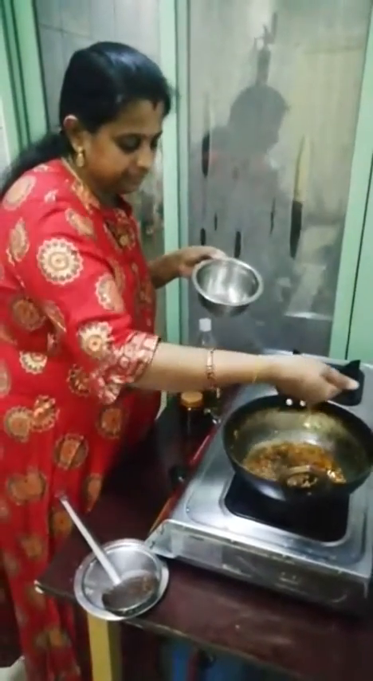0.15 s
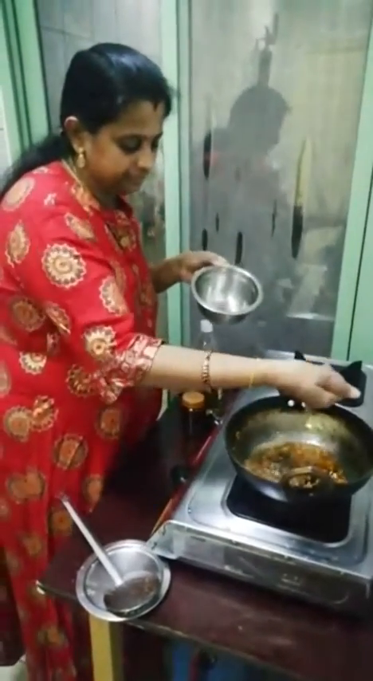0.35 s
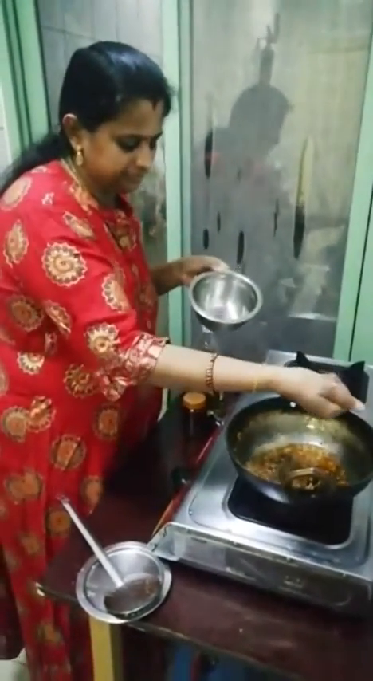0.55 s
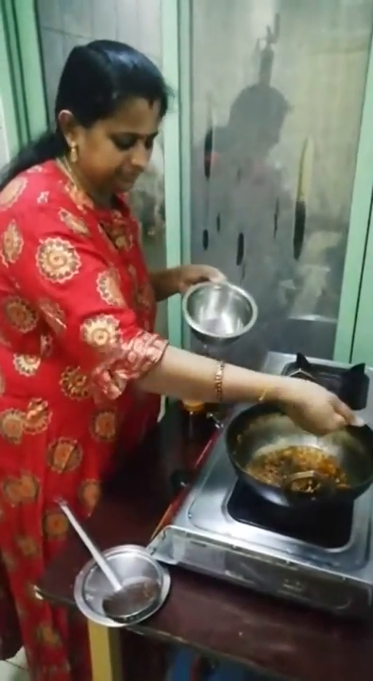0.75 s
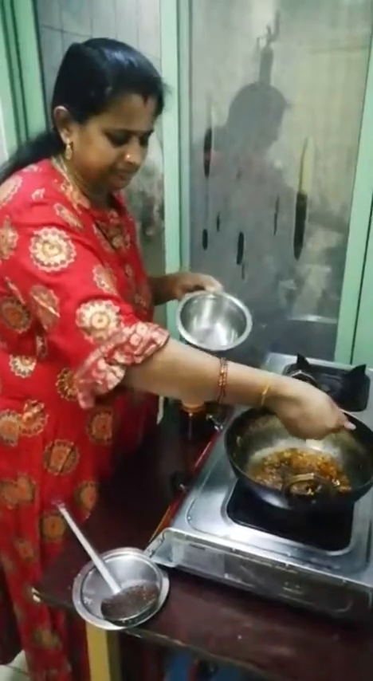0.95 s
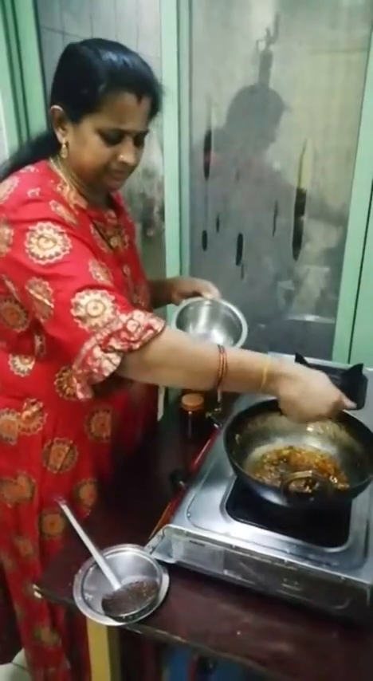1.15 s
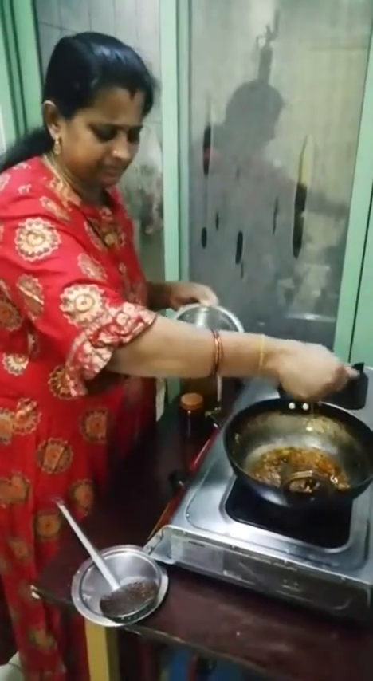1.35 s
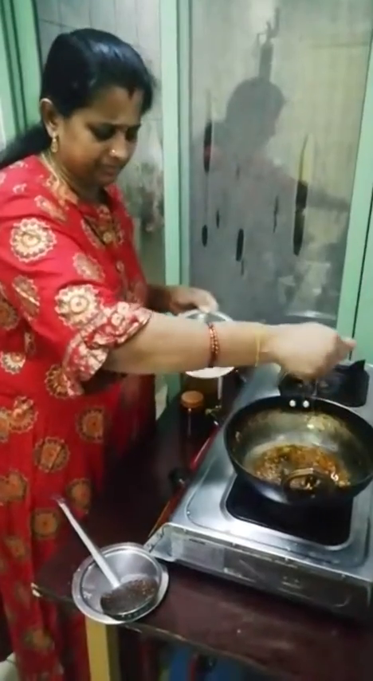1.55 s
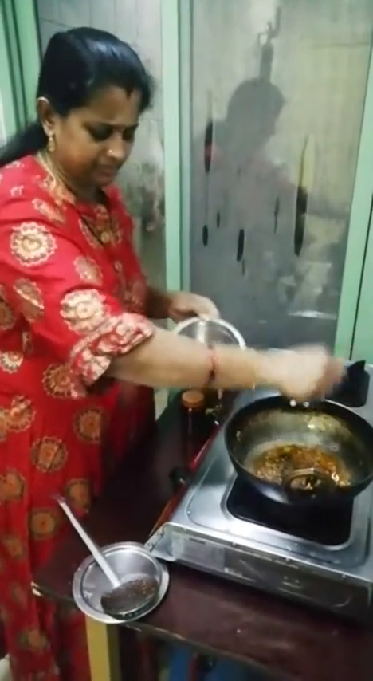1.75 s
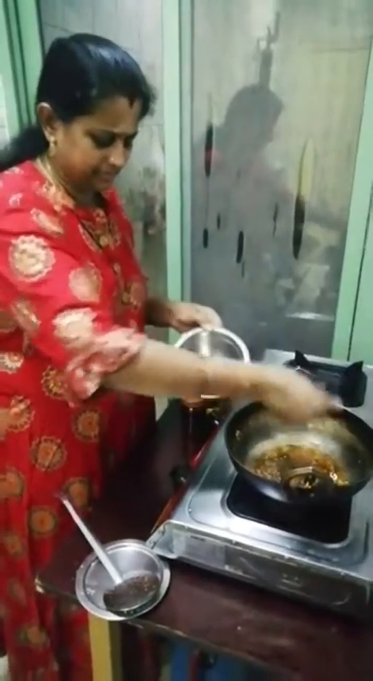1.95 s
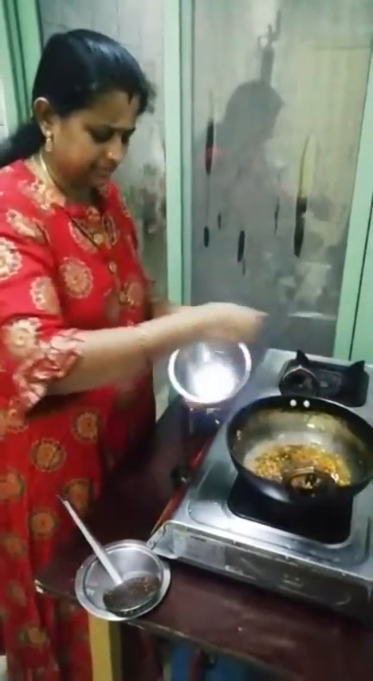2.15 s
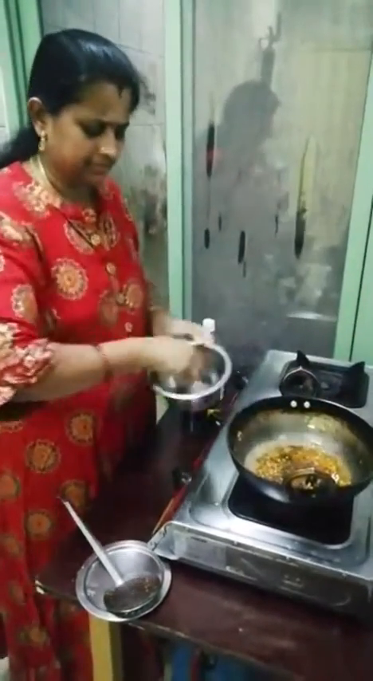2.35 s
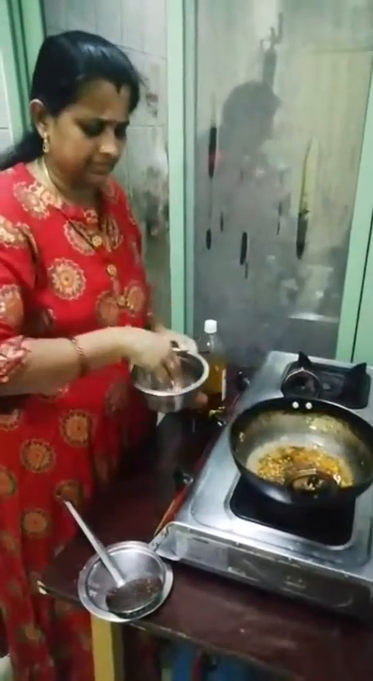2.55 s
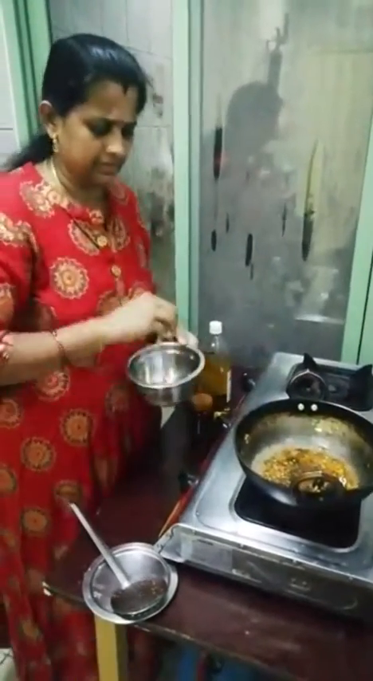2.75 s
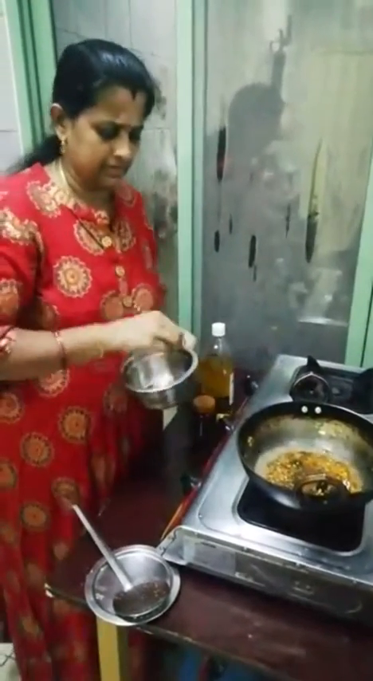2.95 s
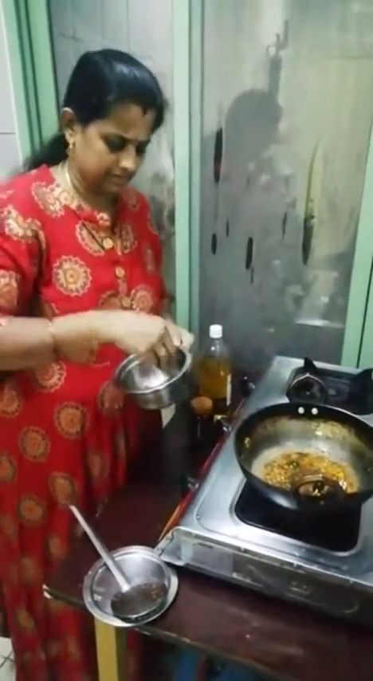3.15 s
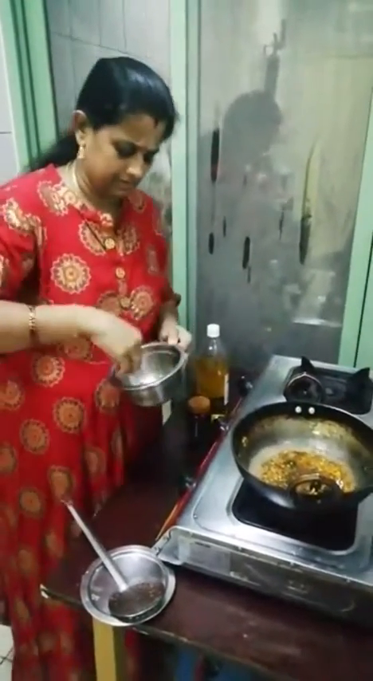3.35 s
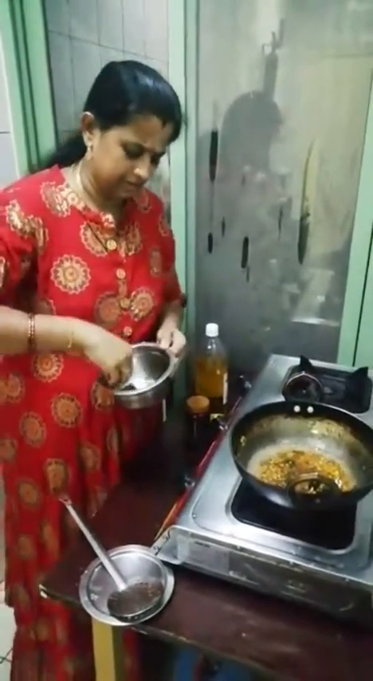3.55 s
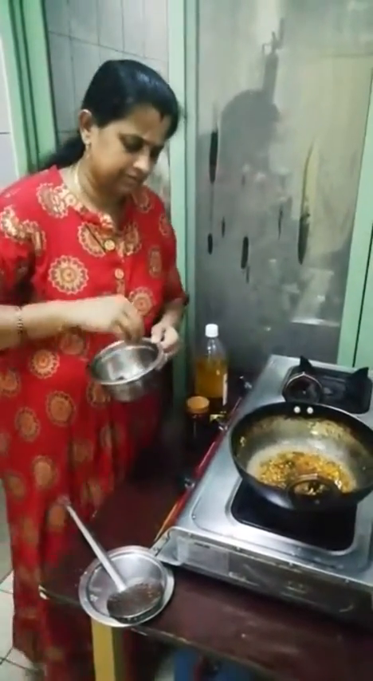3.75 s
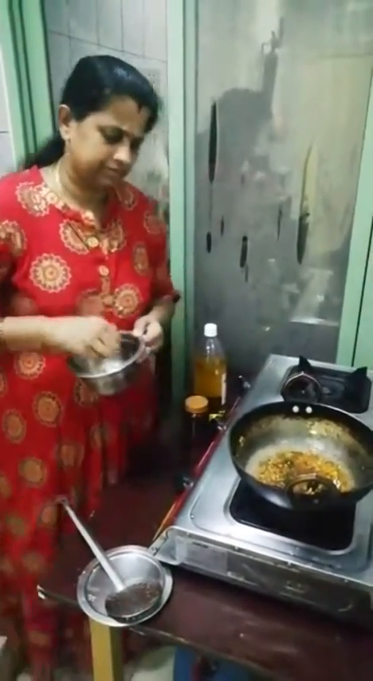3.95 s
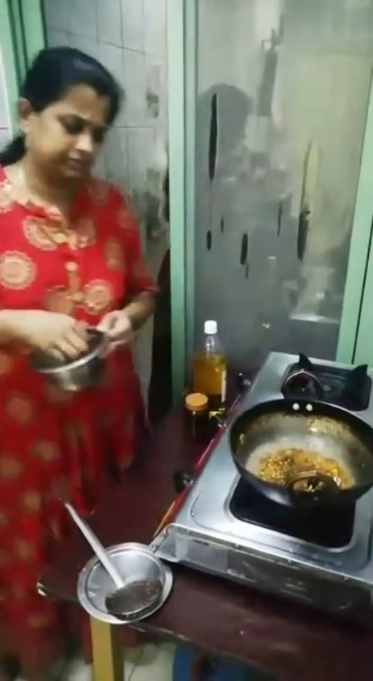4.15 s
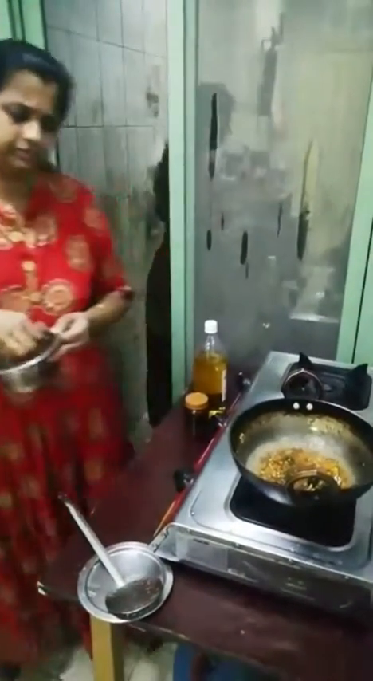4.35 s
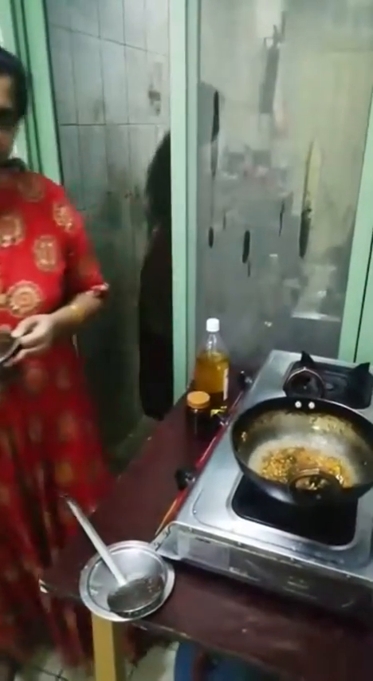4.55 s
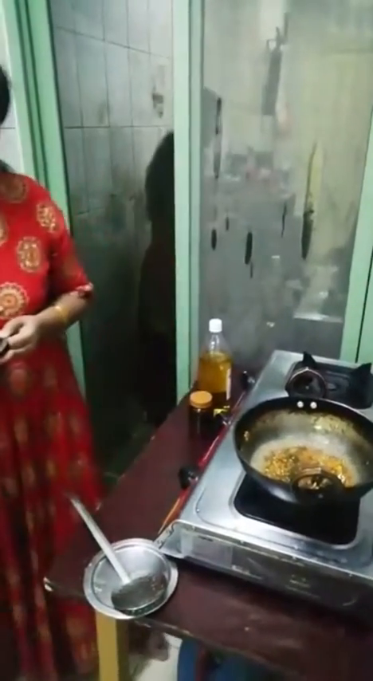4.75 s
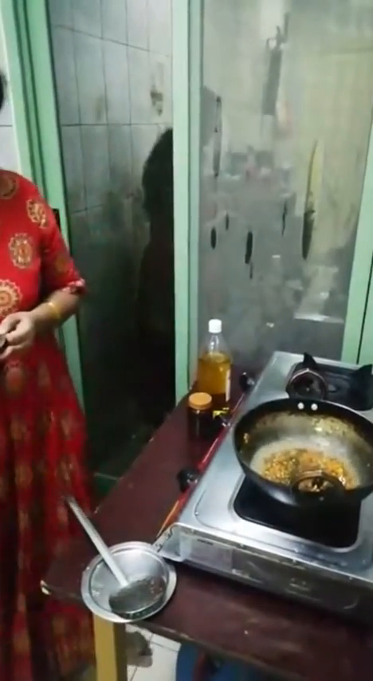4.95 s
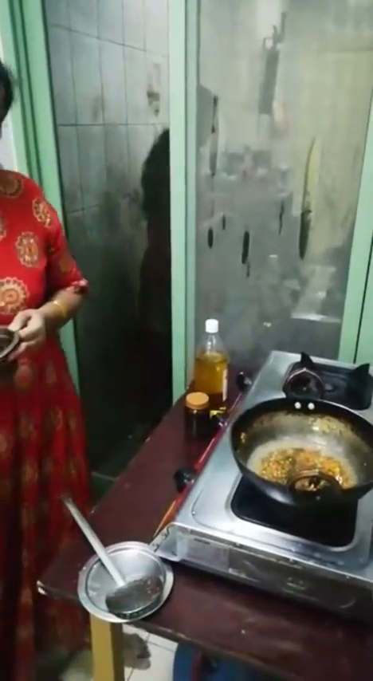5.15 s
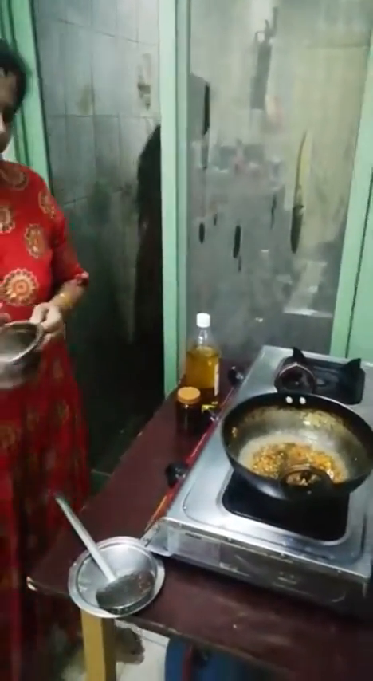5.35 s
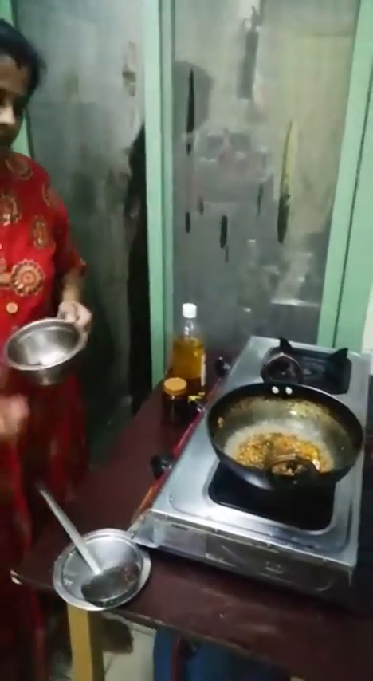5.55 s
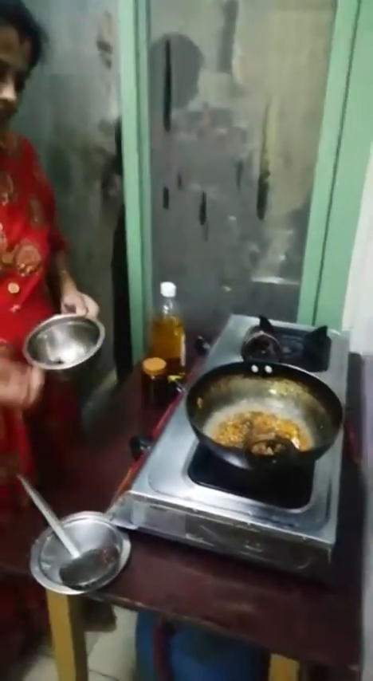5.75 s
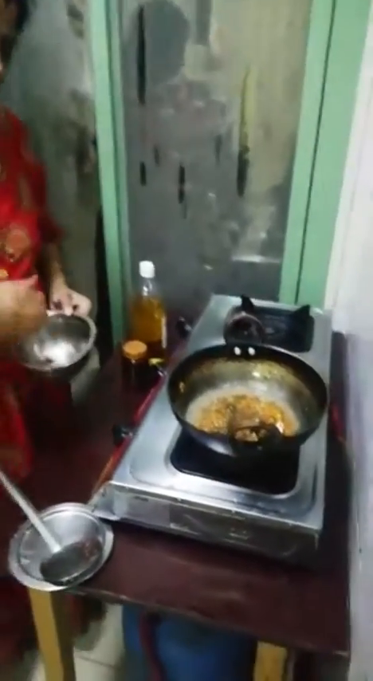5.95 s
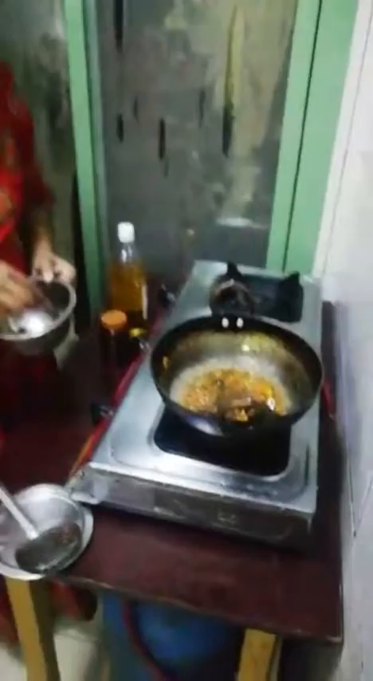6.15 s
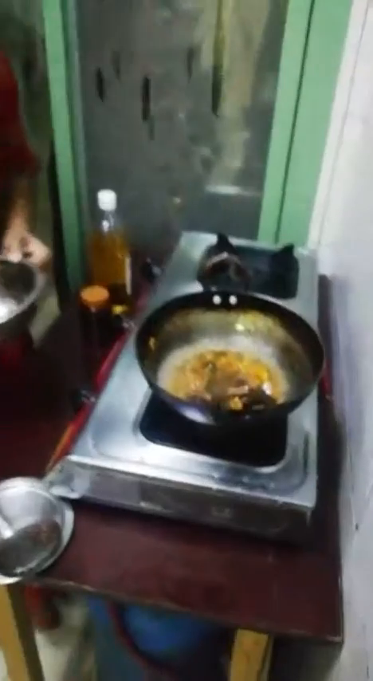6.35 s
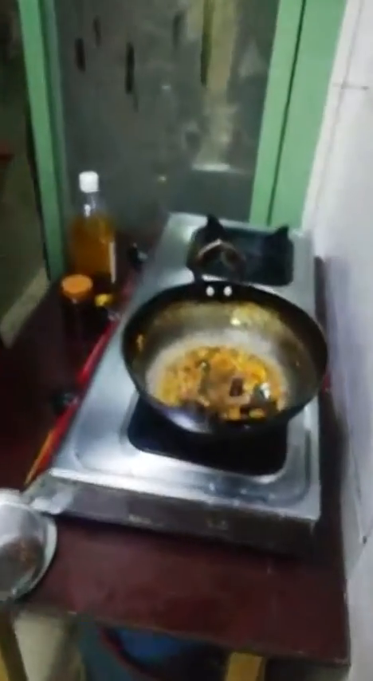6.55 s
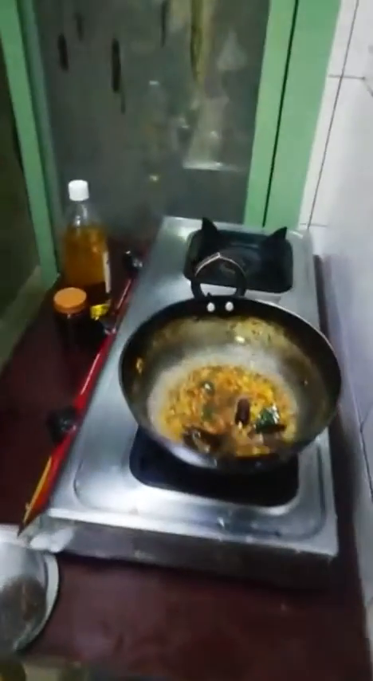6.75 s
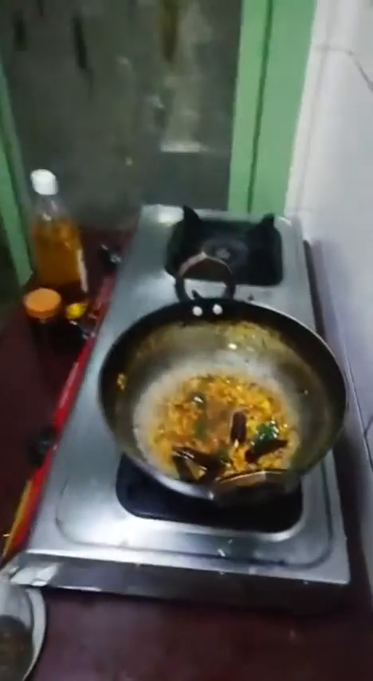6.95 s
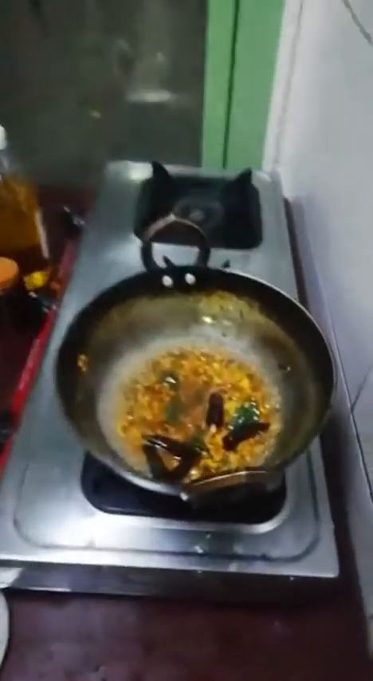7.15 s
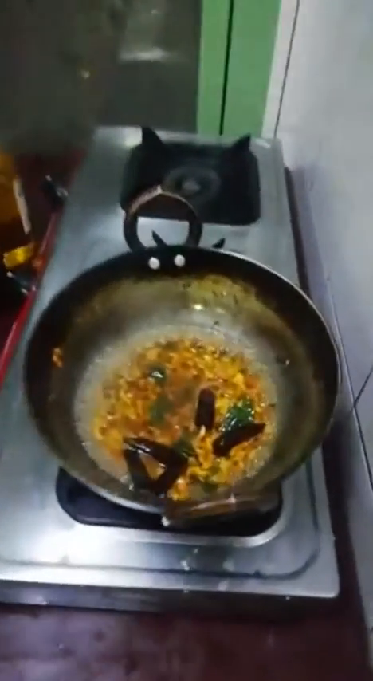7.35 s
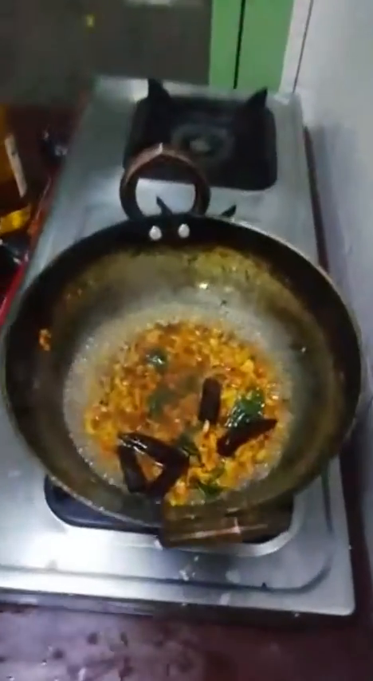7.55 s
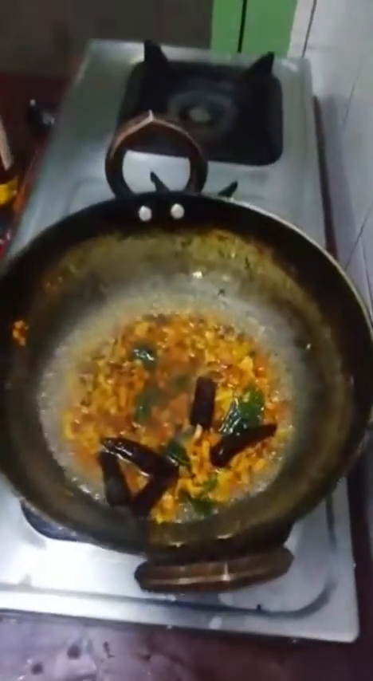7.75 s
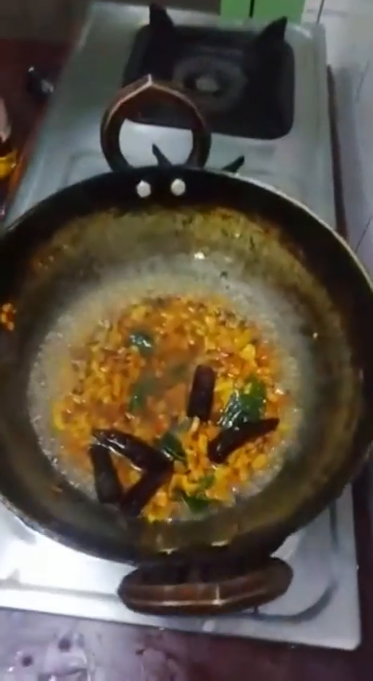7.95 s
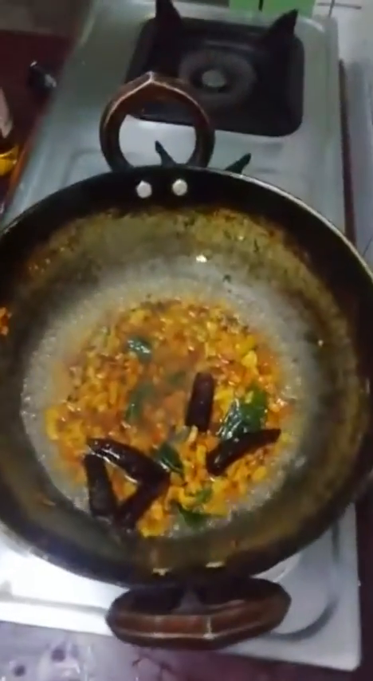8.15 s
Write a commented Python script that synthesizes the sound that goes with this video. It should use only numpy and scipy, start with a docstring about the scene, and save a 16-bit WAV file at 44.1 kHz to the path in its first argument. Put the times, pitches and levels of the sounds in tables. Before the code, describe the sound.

In a small hard-walled kitchen, spices fry in a wok of hot oil: a bright, fierce sizzle that steadily fades to a finer crackle. A steel bowl gives a quick scraping clink early on. A low motor hum wavers behind. Near the end the phone moves in over the pan, the frying grows clearer and closer with small spits, and the bowl is barely touched again.

```python
"""A fierce sizzle comes first: spices in a wok of hot oil, dying to a fine crackle as the moisture boils off.
The frying is crowds of damped bubble pings over steam noise, in a small hard-walled kitchen.
A steel bowl, scraped and ringing in decaying modes, clinks and rattles briefly and is touched lightly at the end.
Behind it a motor hums in wavering sine lines over low room noise. Near the end the phone moves in over the pan;
single spits of oil, short noise ticks, come more closely there."""
import sys
import numpy as np
from scipy import signal
from scipy.fft import rfft, irfft, next_fast_len
from scipy.io import wavfile
from scipy.ndimage import map_coordinates

SR = 44100
rng = np.random.default_rng(int(sys.argv[2]) if len(sys.argv) > 2 else 0)


def digitize_waveform(pressure):
    """Quantize a signal to 16-bit integers and store it at the path in sys.argv[1].

    Rows of a 2-D input are taken as channels; values are limited to [-1, 1].
    """
    field = np.atleast_2d(pressure).T
    bounded = np.clip(field, -1, 1)
    quanta = np.round(bounded * 32767).astype(np.int16)
    wavfile.write(sys.argv[1], SR, quanta)


N = 362502

# Low noise of the room. Each row: frequency in Hz, relative level in dB per Hz.
RUMBLE_COLOUR = [(15, -20), (30, -13), (42, -2.5), (55, -3), (80, 1.5), (125, -6), (170, -3), (240, -7.5),
                 (330, -10), (500, -10), (1200, -56)]
# Weaker lines of the motor. Each row: frequency in Hz, level at the start in dB rms, fade in dB per second,
# gain beside the stove in dB.
HUM_LINES = [(41, -60, .2, 3), (102, -52.5, .7, 6.5), (147.5, -59.5, .4, 12.5), (307, -57.5, .9, 5)]
# Brief swells and sags of the motor's strongest line. Each row: centre in seconds, half length in seconds,
# change in dB.
DRONE_SWELLS = [(.21, .085, 17), (1.2, .07, 10), (3.5, .18, -6.5), (4, .3, 2), (5.6, .18, -3),
                (7.1, .3, 2.5), (7.62, .17, -4), (8.07, .11, 14)]
# Ringing modes of the steel bowl. Each row: frequency in Hz, relative level in dB, decay time t60 in seconds.
BOWL_MODES = [(822.3, 1, 0.17), (859, 1, 0.17), (885, 2.5, 0.15), (970, -2, 0.13), (1650, -7, 0.092),
              (1970, -10, 0.11), (2535, -6.5, 0.16), (2760, -5, .14), (3300, -6, 0.13), (3430, -2, .16),
              (4460, -7, 0.32), (4540, -6, 0.31), (5350, -15, .1), (5600, -5, 0.13), (5880, -6, 0.23),
              (6780, -7, 0.14), (7130, -6, .15), (7205, -2, .18), (8500, -11.5, .12), (10140, -4, 0.13),
              (12000, -7, 0.12), (12500, -8, 0.12), (13500, -11, .1)]
# Contacts of the bowl. Each row: start in seconds, ring in dB, scrape in dB, left minus right in dB;
# ring and scrape are relative levels.
BOWL_CONTACTS = [(2.604, -44, -38, 0), (2.645, -31.5, -17, 3), (2.652, -26, -30, -2),
                 (2.676, -25.5, -19.5, -1), (2.690, -28, -24, -5), (2.742, -36, -38, -6),
                 (7.99, -48, -36, 0), (8.045, -49, -40, 0)]
# Scrape of the bowl's rim. Each row: frequency in Hz, relative level in dB per Hz.
SCRAPE_COLOUR = [(400, -32), (650, -22), (860, 9), (1150, 2), (1900, -1), (3000, -4), (5000, -6),
                 (7000, -9), (9000, -10), (12500, 3), (15500, -3)]
# Single spits of oil. Each row: start in seconds, relative level in dB.
OIL_SPITS = [(3.1128, -27), (3.5693, -26), (4.3799, -28), (4.6399, -26), (4.8943, -26), (6.9596, -30),
             (7.2125, -31), (7.667, -31), (7.6834, -22), (7.6874, -23), (7.7303, -26), (7.9134, -27),
             (8.0296, -30), (8.1379, -25)]
# Colour of the frying. Each row: frequency in Hz, relative level in dB per Hz.
SIZZLE_COLOUR = [(200, -34), (420, -14.5), (560, -9.5), (720, -4.5), (1030, -7), (1250, -2), (1550, -2.5),
                 (1900, 0.5), (2300, -2), (4400, -3.5), (6400, -0.5), (8700, -11), (10000, -8.5),
                 (14000, -9)]
# The wok and its hollow colour the bubbles. Each row: frequency in Hz, width in Hz, lift in dB.
WOK_RESONANCES = [(600, 23, 6.5), (814, 27, 2), (932, 24, 2.5), (1132, 45, 2), (1235, 38, 4),
                  (1376, 36, 1.5), (1880, 40, 1), (1957, 30, 0.5), (3230, 120, 1.5), (6460, 46, -2.5)]
# Colour of the frying right over the wok's hollow. Each row: frequency in Hz, lift in dB.
OVERHEAD_COLOUR = [(700, .5), (1250, -1.5), (1900, 1.8), (2900, 3.3), (4200, .5), (7000, -.5), (9500, 2.5),
                   (13000, 0)]
# The four sounds of frying. Each row: level when wet in dB, lift in the first flare in dB,
# initial loss as it dries in dB per second, gain close to the pan in dB.
SIMMER_LEVEL = (-31.8, 2.8, 1.97, 2.4)
HISS_LEVEL = (-27.6, 3.7, 2.8, 4.7)
FIZZ_LEVEL = (-27.4, 3.2, 3.8, 8.6)
CRACKLE_LEVEL = (-49, 3, 2, 9.5)
# Echo of the kitchen walls. Each row: frequency in Hz, decay time t60 in seconds.
KITCHEN_DECAY = [(300, 0.34), (1000, 0.35), (6000, 0.21), (14000, 0.087)]
# Likeness of the two ports in a diffuse field. Each row: frequency in Hz, left-right correlation from -1 to 1.
PORT_LIKENESS = [(100, .99), (260, 1), (350, 0.21), (500, -0.24), (900, -0.11), (1250, 0.32), (1900, 0.33),
                 (2500, -0.12), (3200, 0.33), (4400, -0.022), (15000, -0.058)]
# Balance of the two microphone ports. Each row: frequency in Hz, left minus right in dB.
PORT_BALANCE = [(200, 0.2), (700, -1.6), (1200, -2), (2000, -0.7), (3000, -0.5), (4400, -3.5), (5500, -7),
                (6500, -12.5), (7600, -14.5), (9000, -1), (10500, 0.4), (12000, 3.5), (14000, 11),
                (15000, 9)]
# Treble resonance shared by both ports. Each row: frequency in Hz, lift in dB.
PRESENCE_LIFT = [(13800, -0.5), (14900, 5.5), (15300, 1), (15750, -5)]

TOP_HZ = 15850  # band limit of the phone
APPROACH_S, ARRIVE_S = 6.15, 7.85  # the phone moves in over the pan
FLARE_S, DRYING_S = .41, 32  # length of the first flare; time constant of the moisture boiling off
# left minus right of the hiss: at first, its drift, its shift close to the pan
HISS_LEAN_DB, TURN_DB_PER_S, NEAR_LEAN_DB = -1, .6, 3.5
# strongest line of the motor: settled level, level at first, span in which it builds
DRONE_DB, FAINT_DB, BUILD_S = -46.3, -56, (1.05, 1.8)
FLUTTER_DB, FLUTTER_RATE = 1.5, 13  # flutter of that line: depth, random knots a second
RUMBLE_DB, RUMBLE_NEAR_DB = -49.3, 2.1  # low room noise: level, gain beside the stove


def amp(db):
    """Decibels to gain."""
    return 10 ** (np.asarray(db) / 20)


def unit(x):
    """Scale to rms 1."""
    return x / np.sqrt(np.mean(x ** 2) + 1e-20)


def along(points, hz):
    """Read (Hz, value) points on a log frequency axis."""
    f, v = np.transpose(points)
    return np.interp(np.log(hz + 1), np.log(f + 1), v)


def wobble(rate):
    """A smooth random curve with rate knots a second."""
    knots = rng.standard_normal(int(N * rate / SR) + 4)
    return map_coordinates(knots, [np.arange(N) * rate / SR])


def filtered(x, response):
    """Shape the spectrum of x by a response of frequency."""
    m = next_fast_len(N + SR // 2)
    hz = np.fft.rfftfreq(m, 1 / SR)
    return irfft(rfft(x, m) * response(hz), m)[..., :N]


def band(x, lo_hz, hi_hz):
    """One band of x with steep smooth edges, at rms 1."""
    def response(hz):
        low_edge = 1 + (lo_hz / (hz + 1)) ** 16
        high_edge = 1 + (hz / hi_hz) ** 16
        return (low_edge * high_edge) ** -.5
    return unit(filtered(x, response))


def lean(db):
    """Left and right gains that lie db apart."""
    return amp(np.array([[1], [-1]]) * db / 2)


def diffuse(pair, spectrum):
    """Two signals become a coloured field; the mid-side mix sets how alike the ports hear it."""
    def mid_side(hz):
        turn = np.arccos(np.clip(along(PORT_LIKENESS, hz), -1, 1)) / 2
        return amp(along(spectrum, hz)) * [np.cos(turn), np.sin(turn)]
    mid, side = filtered(pair, mid_side)
    return unit(np.array([mid + side, mid - side]))


def kitchen(x):
    """The walls' answer at each port: noise tails whose treble dies first."""
    hz, t, z = signal.stft(rng.standard_normal((2, SR // 2)), SR, nperseg=256)
    decay = amp(-60 * t / along(KITCHEN_DECAY, hz)[:, None])
    tail = signal.istft(z * decay, SR, nperseg=256)[1]
    tail = tail / np.linalg.norm(tail[0])
    return signal.fftconvolve(x[None], tail, axes=1)[:, :N]


def closeness():
    """Place of the phone: 0 away from the stove, 1 right over the pan."""
    return np.interp(np.arange(N) / SR, [APPROACH_S, ARRIVE_S], [0, 1])


def rumble():
    """Low noise of the room, nearly alike at both ports in the deep bass."""
    level_db = RUMBLE_DB + RUMBLE_NEAR_DB * closeness()
    return amp(level_db) * diffuse(rng.standard_normal((2, N)), RUMBLE_COLOUR)


def hum_line(hz, drift, phase=0):
    """One sine line at rms 1 whose phase wavers by drift radians."""
    t = np.arange(N) / SR
    return np.sqrt(2) * np.sin(2 * np.pi * hz * t + drift * wobble(5) + phase)


def motor():
    """A hum of wavering lines; the strongest builds early, flutters and swells."""
    t, near = np.arange(N) / SR, closeness()
    swells_db = sum(db * np.exp(-((t - s) / half_s) ** 2) for s, half_s, db in DRONE_SWELLS)
    build_db = np.interp(t, BUILD_S, [FAINT_DB, DRONE_DB])
    drone_db = build_db + swells_db + FLUTTER_DB * wobble(FLUTTER_RATE)
    port_phase = 0.22 * np.array([[-1], [1]])  # radians
    hum = amp(drone_db) * hum_line(hz=196.8, drift=.5, phase=port_phase)
    for hz, db, fade, near_db in HUM_LINES:
        line_db = db - fade * t + near_db * near + 2.5 * wobble(4)
        hum = hum + amp(line_db) * hum_line(hz, drift=0.87)
    return hum


def bowl():
    """Each contact scrapes briefly and rings the steel, whose modes chatter in phase."""
    t = np.arange(SR // 2) / SR
    hz, level_db, t60 = np.transpose(BOWL_MODES)[:, :, None]
    scrape_gain = amp(along(SCRAPE_COLOUR, np.fft.rfftfreq(len(t), 1 / SR)))
    near = np.zeros((2, N + SR))
    for s, ring_db, scrape_db, lean_db in BOWL_CONTACTS:
        chatter = signal.resample(rng.standard_normal((len(BOWL_MODES), 64)), len(t), axis=1)
        phase = 2 * np.pi * (hz * t + rng.random(hz.shape)) + 0.63 * chatter
        modes = amp(level_db + ring_db - 60 * t / t60) * np.sin(phase)
        ring = modes.sum(0) * (1 - np.exp(-t / 0.0026))  # soft onset
        rub = irfft(rfft(rng.standard_normal(len(t))) * scrape_gain, len(t))
        contact = ring + amp(scrape_db - 60 * t / 0.086) * rub
        near[:, round(s * SR):][:, :len(t)] += contact * lean(lean_db)
    near = near[:, :N]
    return amp(-0.5) * near + amp(-3) * kitchen(near.mean(0))


def spits():
    """A droplet bursts in the oil with one sharp, bright tick of decaying noise."""
    t = np.arange(SR // 50) / SR
    ticks = np.zeros(N + SR)
    for s, db in OIL_SPITS:
        decay = amp(-60 * t / .008)
        ticks[round(s * SR):][:len(t)] += amp(db - 9) * decay * rng.standard_normal(len(t))
    bright = [(2000, -25), (7000, -7), (12000, 3.5)]  # Hz, dB
    ticks = filtered(ticks[:N], lambda hz: amp(along(bright, hz)))
    return ticks * lean(db=12) + amp(-14) * kitchen(ticks)


def pops(rate, pitch_hz, spread, cycles, size_db):
    """Bursting bubbles: damped pings at random moments, many small and few large."""
    chance = rng.random((int(rate * N / SR), 3))
    start = (chance[:, :1] * N).astype(int)
    hz = np.minimum(pitch_hz * np.exp(spread * (2 * chance[:, 1:2] - 1)), TOP_HZ)
    size = amp(-size_db * np.log(np.maximum(chance[:, 2:], .015)))  # the floor caps the largest
    k = np.arange(112)
    turns = hz * k / SR
    pings = size * np.sin(2 * np.pi * turns) * np.exp(-turns / cycles)
    return unit(np.bincount((start + k).ravel(), pings.ravel(), N)[:N])


def wok_lift_db(hz):
    """Resonances of the wok and its hollow, as a sum of bell-shaped lifts."""
    return sum(db / (1 + (2 * (hz - centre) / width) ** 2) for centre, width, db in WOK_RESONANCES)


def froth(pitch_hz, rate, size_db, steam_db, room_db):
    """A crowd of bubbles around one pitch, with its echo, over the even rush of steam."""
    bubbles = np.array([pops(rate, pitch_hz, spread=0.69, cycles=1.05, size_db=size_db) for port in range(2)])
    crowd = bubbles + amp(steam_db) * rng.standard_normal((2, N))
    crowd = crowd + amp(room_db) * kitchen(crowd[0])
    coloured = filtered(crowd, lambda hz: amp(wok_lift_db(hz)))
    return diffuse(coloured, SIZZLE_COLOUR)


def boiling(wet_db, flare_db, loss_db_per_s, near_db):
    """Level in dB of one frying sound: brief flare, slow fade as the spices dry, rise as the phone nears."""
    t = np.arange(N) / SR
    dried_s = DRYING_S * (1 - np.exp(-t / DRYING_S))
    flare = np.exp(-(t / FLARE_S) ** 3)
    return wet_db + flare_db * flare - loss_db_per_s * dried_s + near_db * closeness()


def near_crackle():
    """High pops in clumps, mostly at the left port, with their echo."""
    crackle = pops(rate=900, pitch_hz=13470, spread=0.15, cycles=4.2, size_db=3.5)
    crackle = band(crackle, lo_hz=8000, hi_hz=19000)
    crackle = crackle * amp(1.5 * wobble(30))  # clumps
    return crackle * lean(db=13) + amp(-5) * kitchen(crackle)


def frying():
    """Large bubbles simmer, small ones hiss and the finest fizz; near pops crackle on top."""
    near = closeness()
    hiss_lean_db = HISS_LEAN_DB + TURN_DB_PER_S * np.arange(N) / SR + NEAR_LEAN_DB * near
    surge_db = .45 * wobble(14)  # moisture meets the oil unevenly
    simmer = froth(pitch_hz=1513, rate=1800, size_db=1.5, steam_db=6, room_db=-12.5)
    simmer = band(simmer, lo_hz=300, hi_hz=2570)
    hiss = froth(pitch_hz=5000, rate=2500, size_db=2, steam_db=5.5, room_db=-11.5)
    hiss = band(hiss, lo_hz=2400, hi_hz=8640)
    fizz = froth(pitch_hz=12000, rate=2500, size_db=1, steam_db=2.5, room_db=-13)
    fizz = band(fizz, lo_hz=8300, hi_hz=19000)
    pan = amp(boiling(*SIMMER_LEVEL) + 0.28 * wobble(7)) * simmer
    pan = pan + amp(boiling(*HISS_LEVEL)) * hiss * lean(hiss_lean_db)
    pan = pan + amp(boiling(*FIZZ_LEVEL) + .3 * wobble(8)) * fizz
    pan = pan + amp(boiling(*CRACKLE_LEVEL)) * near_crackle()
    overhead = filtered(pan, lambda hz: amp(along(OVERHEAD_COLOUR, hz)))
    return amp(surge_db) * (pan + near * (overhead - pan))


def scene():
    """Room and motor behind, the bowl, then the spitting and frying pan."""
    return rumble() + motor() + bowl() + spits() + frying()


def record(dry):
    """Each port has its own colour; the phone keeps nothing above its band limit."""
    def response(hz):
        balance = lean(along(PORT_BALANCE, hz))
        presence = amp(along(PRESENCE_LIFT, hz))
        return balance * presence * (hz < TOP_HZ)
    return filtered(dry, response)


dry = scene()
out = record(dry)
digitize_waveform(out)
```